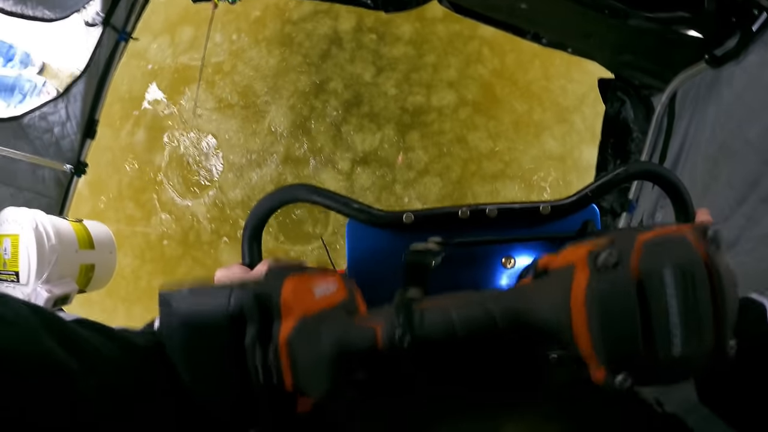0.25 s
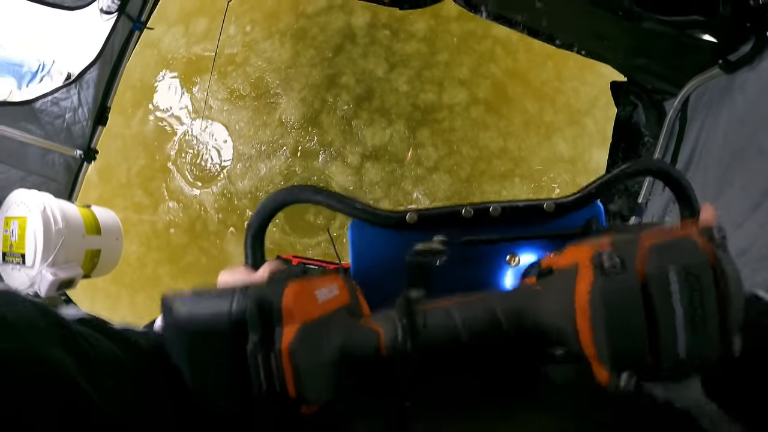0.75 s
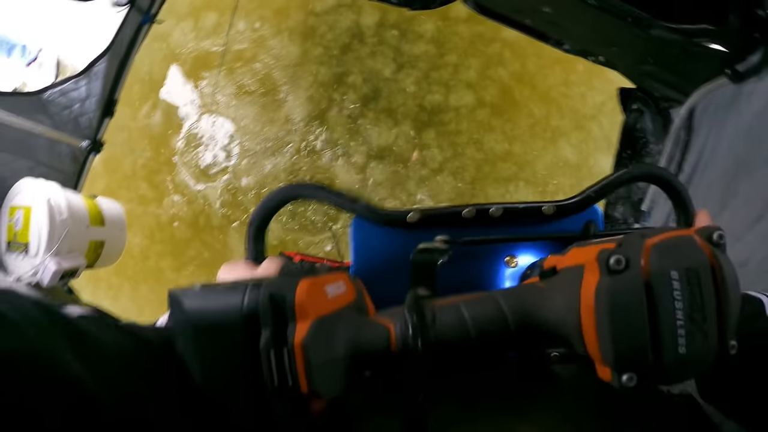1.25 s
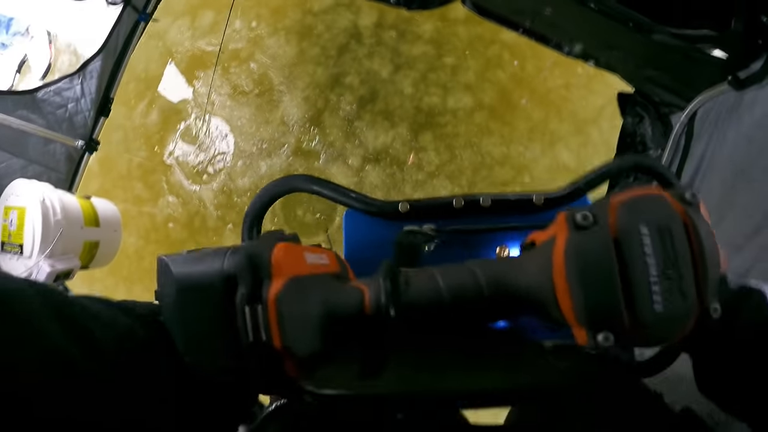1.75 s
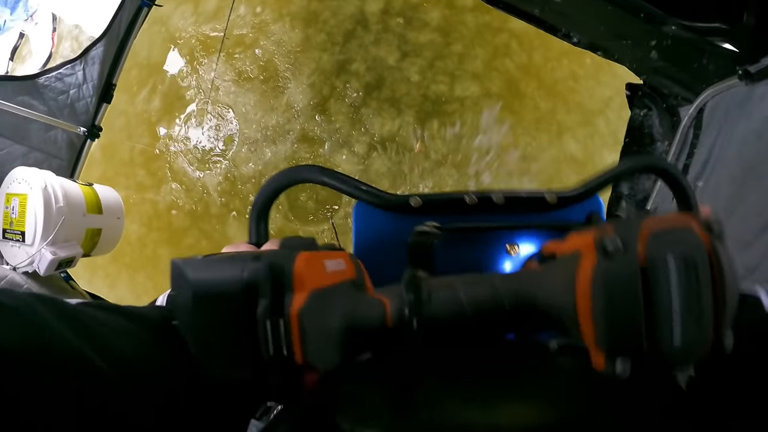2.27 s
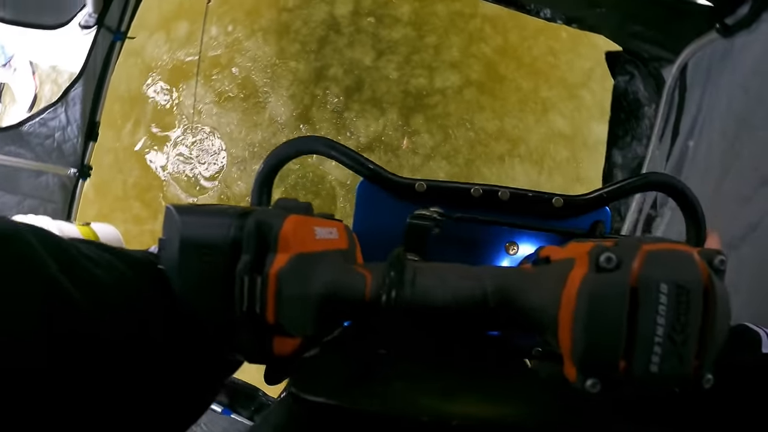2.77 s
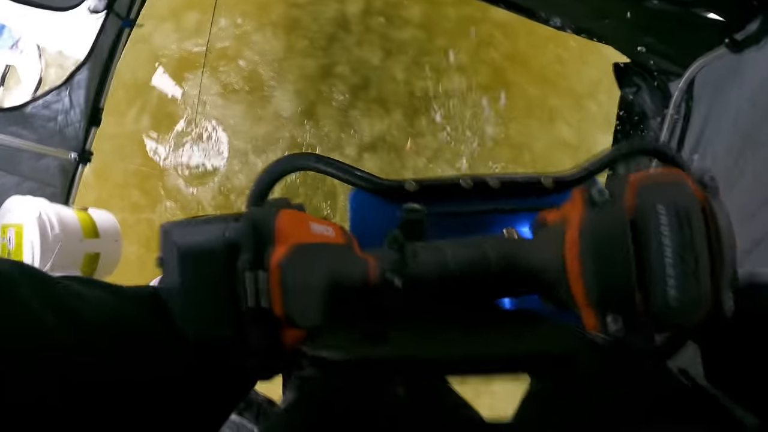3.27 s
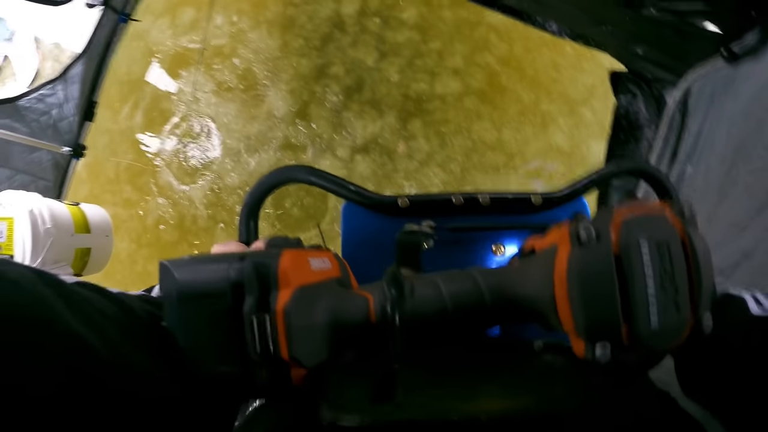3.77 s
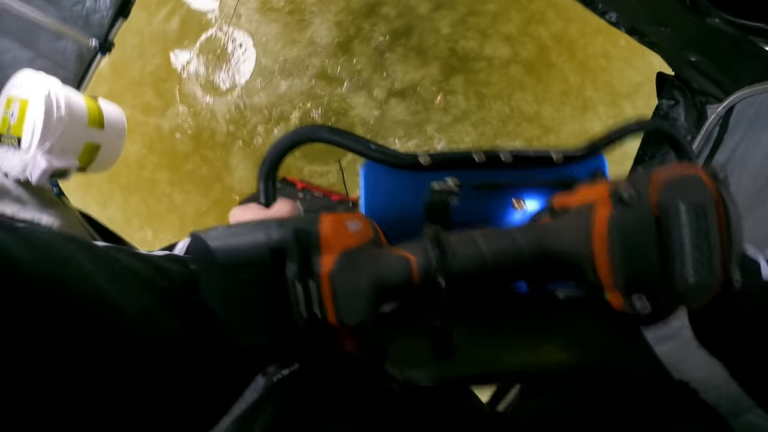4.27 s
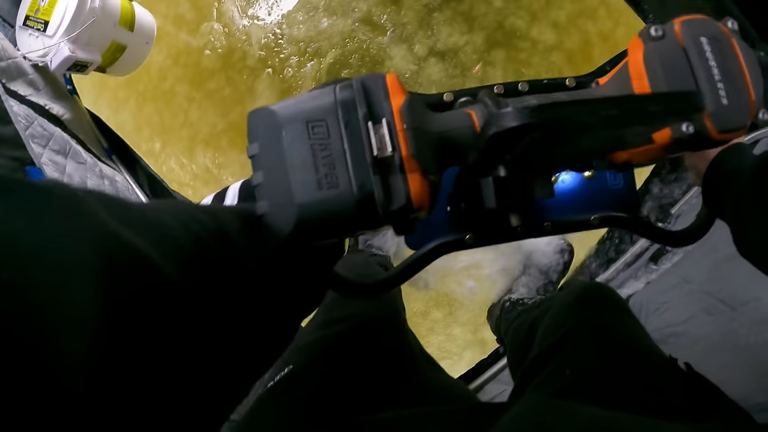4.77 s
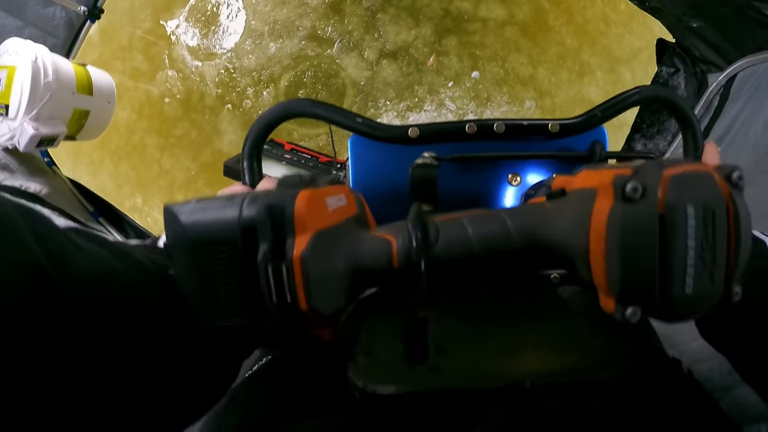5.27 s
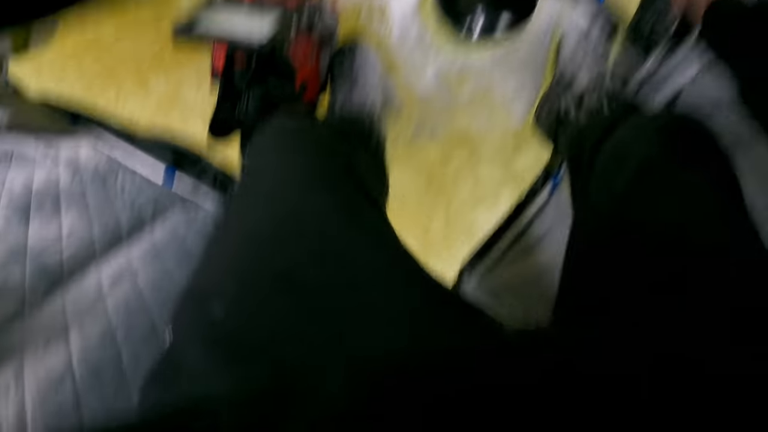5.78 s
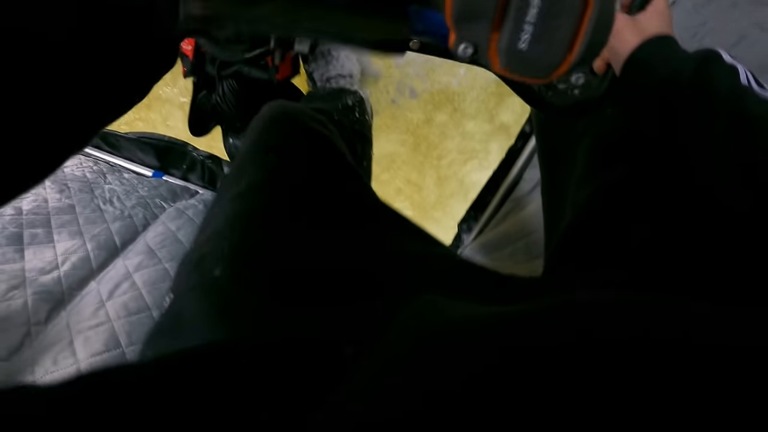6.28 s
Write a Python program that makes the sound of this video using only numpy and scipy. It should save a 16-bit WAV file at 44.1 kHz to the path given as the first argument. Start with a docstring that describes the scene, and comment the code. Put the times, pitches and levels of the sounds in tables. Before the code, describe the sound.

Close to the microphone in a fabric ice fishing shelter, a cordless drill drives an auger in seven short bursts. Each starts with a squeak and rises to a whine while the blades shave ice and the frame rumbles and knocks. A longer cut follows, then clicks and thuds. After one last brief pull, the auger is heaved up through the water with glugs and spray. Slush laps and clothing rustles faintly underneath.

```python
"""Inside a fabric fishing shelter on the ice, the microphone close to a cordless drill on an ice auger.
Slush laps in the hole and clothing rubs. From 0.25 s come seven short pulls of the trigger, then a long
cut at 3.6 s: each time the motor buzzes, the gears run up to a whine, and the blades shave ice while the
auger and its frame rumble and knock. On a ninth pull, at 5.4 s, the auger labours in slush and is heaved
up through the water in two surges, with glugs, spray and last knocks from the frame."""
import sys
import numpy as np
from scipy import signal
from scipy.fft import rfft, irfft, next_fast_len
from scipy.io import wavfile
from scipy.ndimage import uniform_filter1d

SR = 44100
rng = np.random.default_rng(int(sys.argv[2]) if len(sys.argv) > 2 else 0)


def inscribe(sig):
    """Save sig as 16-bit PCM at rate SR to the path in sys.argv[1].

    A 1-D sig is mono; a 2-D sig holds one channel per row.
    Samples are clipped to [-1, 1] before scaling.
    """
    pcm = np.round(np.clip(np.atleast_2d(sig).T, -1, 1) * 32767)
    wavfile.write(sys.argv[1], SR, pcm.astype(np.int16))


N = 287973
T = np.arange(N) / SR


def amp(db):
    """Decibels to gain."""
    return 10 ** (np.asarray(db) / 20)


def unit(x):
    """Scales to rms 1."""
    return x / np.sqrt(np.mean(x ** 2) + 1e-20)


def add(mix, s, sound):
    """Mixes a sound in at time s."""
    part = mix[max(round(s * SR), 0):][:len(sound)]
    part += sound[:len(part)]


def swell(start, end, rise, fall):
    """An envelope that rises from start, holds, and dies away after end; all in seconds."""
    return (1 - np.exp(-(np.maximum(T - start, 0) / rise) ** 2)) * np.exp(-np.maximum(T - end, 0) / fall)


def wander(hz):
    """Random drift of rms 1, mostly slower than hz."""
    size = next_fast_len(N, real=True)
    rolloff = 1 + (np.fft.rfftfreq(size, 1 / SR) / hz) ** 4
    return unit(irfft(rfft(rng.standard_normal(size)) / rolloff, size)[:N])


def colour(x, points, size=4096):
    """Causal filter with the given (Hz, dB) outline."""
    hz, db = np.transpose(points)
    outline = np.interp(np.log(abs(np.fft.fftfreq(size, 1 / SR)) + 1), np.log(hz + 1), db)
    response = np.exp(np.conj(signal.hilbert(np.log(amp(outline) + 1e-5))))  # minimum phase
    return signal.oaconvolve(x, np.fft.ifft(response).real[:size // 2])[:len(x)]


def resonate(x, hz, width):
    """A resonance of gain 1, width in Hz, whose pitch can follow a curve."""
    turn = np.exp(2j * np.pi * np.cumsum(hz * np.ones(len(x))) / SR)
    pole = np.exp(-np.pi * width / SR)
    return 2 * (turn * signal.lfilter([1 - pole], [1, -pole], x / turn)).real


def grains(per_s, spread_db):
    """Random tiny impulses, most of them small and a few large."""
    size = amp(spread_db * np.minimum(rng.exponential(1, N), 4))
    return size * rng.choice([-1., 1.], N) * (rng.random(N) < per_s / SR)


def steady(x, seconds):
    """Holds the mean power at 1 over stretches of the given length, keeping the finer grain."""
    power = uniform_filter1d(uniform_filter1d(x ** 2, int(seconds * SR)), int(seconds * SR))
    return x / np.sqrt(abs(power) + 1e-12)


def hum(hz=80, db=-52.5):
    """A faint, wavering low hum."""
    pitch_hz = hz * (1 + 0.032 * wander(10.5))
    return amp(db + 2.3 * wander(3.0)) * unit(np.sin(2 * np.pi * np.cumsum(pitch_hz) / SR))


# Bright spectrum shared by hiss, clothing and clicks: (frequency [Hz], level [dB])
RUSTLE_SPECTRUM = [(650, -1.5), (1100, -5), (2000, 0.5), (3300, -1), (4200, 0), (7200, -6.5), (9700, -9.5),
                   (12000, -23), (15000, -35)]

def hiss(db=-73):
    """A faint hiss, independent left and right."""
    return amp(db) * np.array([unit(colour(rng.standard_normal(N), RUSTLE_SPECTRUM)) for side in "LR"])


# Spells of rubbing clothes and sliding slush: (start [s], end [s], level [dB])
RUB_SPELLS = [(-0.03, 0.19, -40), (0.55, 2.75, -42), (3.38, 3.6, -43), (4.651, 4.78, -52), (5.0, 5.4, -53),
              (5.7, 6.14, -49.5), (6.448, 6.66, -45.5)]

def rubbing(floor_db=-56.5):
    """Clothes rub and slush slides in spells, over a quiet, constant rustle."""
    rustle = steady(colour(grains(7000, 1.1) * amp(1.4 * wander(50)), RUSTLE_SPECTRUM), 0.035)
    spells = sum(amp(db) * swell(start, end, 0.018, 0.036) for start, end, db in RUB_SPELLS)
    return (amp(floor_db) + spells) * rustle


# Slush moving in the hole: (frequency [Hz], level [dB])
LAP_SPECTRUM = [(25, -22), (70, -6.5), (130, -2.5), (260, 2), (400, -0.5), (620, -6), (850, -12),
                (1300, -16), (2200, -47)]

def lapping(db=-39, drift_db=0.86, calm_db=-2.5):
    """Slush laps in the hole all the while, less once the auger is out."""
    laps = steady(colour(grains(2000, 1.4), LAP_SPECTRUM), 0.034)
    auger_out = T > AUGER_HEAVES[-1][1]
    return amp(db + drift_db * wander(1.6) + calm_db * auger_out) * laps


def shifting_rasp(hz=3300, width=800, db=-51):
    """A thin, faint rasp while the auger is shifted in the hole."""
    friction = unit(resonate(resonate(grains(3400, 2.3), hz, width), hz, width))
    return amp(db + 1.2 * wander(23)) * swell(4.78, 5.31, 0.013, 0.017) * friction


# Clicks of the trigger and fittings: (time [s], level [dB], ring pitch [Hz], ring t60 [s])
FITTING_CLICKS = [(0.136, -21.5, 5220, 0.015), (2.918, -24, 2420, .03), (3.4, -36.5, 1952, 0.32),
                  (3.52, -25.5, 1940, 0.012), (5.207, -19.5, 2370, .03), (5.439, -27, 4300, .03),
                  (5.801, -24.5, 2260, 0.044)]

def clicks(snap_t60=0.034, snap_db=-4):
    """The trigger or a fitting gives a hard snap with one ringing mode."""
    out, t = np.zeros(N), T[:SR // 4]
    for s, db, hz, t60 in FITTING_CLICKS:
        noise = unit(colour(rng.standard_normal(len(t)), RUSTLE_SPECTRUM))
        snap = amp(snap_db - 60 * t / snap_t60) * noise
        ring = amp(-60 * t / t60) * np.sin(2 * np.pi * hz * t)
        add(out, s, amp(db) * (ring + snap))
    return out


# Air pockets ringing in the hole: (time [s], first pitch [Hz], last pitch [Hz], level [dB], length [s])
AIR_POCKETS = [(5.611, 383.6, 352, -10, 0.087), (5.639, 308, 272, -14.5, 0.108),
               (5.863, 553, 668, -20, 0.087), (5.935, 380, 336, -17.5, 0.081)]

def glugs():
    """Each air pocket swells and dies, gliding in pitch as the auger squeezes it."""
    out = np.zeros(N)
    for s, first_hz, last_hz, db, length in AIR_POCKETS:
        hz = np.linspace(first_hz, last_hz, int(length * SR))
        arch = np.sin(np.linspace(0, np.pi, len(hz)))
        add(out, s, amp(db) * arch * np.sin(2 * np.pi * np.cumsum(hz) / SR))
    return out * amp(3.2 * wander(51))


# Churned water and its spray: (frequency [Hz], level [dB])
CHURN_SPECTRUM = [(29, -68), (50, -35), (241, -6), (290, 0), (600, -10.5), (658, -8), (856, -22),
                  (1450, -32), (2000, -31), (2600, -63), (4400, -120)]
SPRAY_SPECTRUM = [(600, -18), (1100, -6), (1700, -2.5), (2700, -0.5), (3800, -3.5), (7000, -10.5),
                  (10500, -21), (12000, -34), (15000, -60)]
# Heaves through the water: (start [s], end [s], rise [s], surge level [dB], spray level [dB],
# spray slope [dB/s], first gurgle pitch [Hz], last gurgle pitch [Hz])
AUGER_HEAVES = [(5.437, 5.71, 0.052, -12, -13.5, -77, 450, 286),
                (5.815, 5.983, .02, -16, -28, -16, 555, 328)]

def heaves(churn_db=-4, gurgle_db=-7, settle_s=0.026):
    """Each heave churns the water: the gurgle sinks in pitch while the spray thins out."""
    surge, splash, gurgle_hz = np.zeros((3, N))
    for start, end, rise, surge_db, spray_db, spray_slope, first_hz, last_hz in AUGER_HEAVES:
        heave = swell(start, end, rise, settle_s)
        surge += amp(surge_db) * heave
        splash += amp(spray_db + spray_slope * np.clip(T - start, 0, end - start)) * heave
        gurgle_hz = np.where(T >= start, np.interp(T, [start, end], [first_hz, last_hz]), gurgle_hz)
    churn = steady(colour(grains(900, 4.2), CHURN_SPECTRUM), 0.019)
    gurgle = steady(resonate(resonate(grains(400, 3.2), gurgle_hz, 110), gurgle_hz, 140), 0.014)
    spray = steady(colour(grains(4000, 1.3) * amp(2.0 * wander(110)), SPRAY_SPECTRUM), 0.043)
    return surge * (amp(churn_db) * churn + amp(gurgle_db) * gurgle) + splash * spray


# Low modes of the struck frame: (frequency [Hz], level [dB], t60 [s])
THUD_MODES = [(189, -3.5, 0.06), (279, -6, 0.089), (318, 2, 0.037), (363.3, 1.5, 0.066), (464.4, 5, 0.061),
              (570, -1.5, 0.072), (833, -16.5, 0.16), (1054, -15.5, 0.03)]
# The clatter after a knock: (frequency [Hz], level [dB])
CLATTER_SPECTRUM = [(400, -14), (700, 3), (1400, -4), (2400, -3), (3200, -5), (6800, -8.5), (10000, -28),
                    (12000, -39), (15000, -63)]
# Knocks of blades, auger and frame: (time [s], thud level [dB], relative clatter level [dB])
FRAME_KNOCKS = [(0.132, -32.5, -35), (0.382, -6.5, -33), (1.016, -5, -32), (1.195, -24, -46),
                (1.554, -11, -34), (2.408, -19.5, -35), (2.585, -25, -32), (2.618, -20.5, -30.5),
                (2.769, -25.5, -52), (3.183, -13, -17), (3.27, -10.5, -24), (3.344, -11, -27),
                (4.984, -14, -31.5), (5.124, -19, -35), (5.152, -19.5, -31), (5.187, -4, -28.5),
                (5.198, -14, -25.5), (5.583, -7, -35), (5.622, -4.5, -24), (5.651, -14, -36),
                (5.841, -19, -20), (5.977, -8.5, -28), (6.062, -23.5, -58), (6.081, -26, -58),
                (6.122, -26, -38), (6.295, -27, -44.5), (6.455, -31, -39)]

def knocks(clatter_trim_db=-2, rise_s=0.00092, clatter_t60=0.17, hard_db=-15, deepen=0.5):
    """Each knock rings the frame's low modes and shakes loose a short clatter."""
    thuds, shaking, t = np.zeros(N), np.zeros(N), T[:SR // 3]
    rattle = steady(colour(grains(5000, 3.9), CLATTER_SPECTRUM), 0.016)
    hz, db, t60 = np.transpose(THUD_MODES)[:, :, None]
    attack = 1 - np.exp(-(t / rise_s) ** 2)
    for s, thud_db, clatter_db in FRAME_KNOCKS:
        grip = 1 + 0.052 * rng.standard_normal(hz.shape)  # the grip detunes the ring
        tilt_db = deepen * (hard_db - thud_db) * np.log2(hz / hz[0])  # harder knocks reach deeper modes
        modes = amp(db + tilt_db - 60 * t / t60) * np.sin(2 * np.pi * hz * grip * t)
        ring = (modes[::2].sum(0) - modes[1::2].sum(0)) * attack  # modes alternate in sign
        add(thuds, s, amp(thud_db) * ring / abs(ring).max())
        add(shaking, s, amp(clatter_db - 60 * t / clatter_t60))
    return thuds + amp(clatter_trim_db) * shaking * rattle


# Shaved ice and the shaking auger: (frequency [Hz], level [dB])
SCRAPE_SPECTRUM = [(650, -47), (1100, -15.5), (1340, -10.5), (2360, -1.5), (2700, -5), (3390, -2.5),
                   (4000, -3), (4360, -2.5), (6050, -6.5), (6680, -6), (8970, -16), (9900, -15),
                   (12100, -34), (13600, -36), (15000, -63)]
RUMBLE_SPECTRUM = [(30, -45), (90, -15.5), (150, -7), (250, -9), (310, -3.5), (400, -2.5), (520, -7),
                   (720, -10.5), (1000, -13.5), (1300, -23), (2500, -50)]
# Resonances of the frame: (frequency [Hz], width [Hz], level over the rumble [dB])
FRAME_MODES = [(310, 7.9, -12), (354.4, 41, 4), (466, 36, 4.5), (582, 61, 3), (826, 17.6, 10.5),
               (934, 21, 5), (1176, 25, -2)]
# Trigger pulls, driving blades and drill: (pressed [s], run-up [s], released [s], whine overhang [s],
# relative whine level [dB], squeak level [dB], scrape level [dB], rumble level [dB])
TRIGGER_PULLS = [(0.252, 0.272, 0.52, 0.0067, -35, -19.5, -16, -20.5),
                 (0.795, 0.815, 1.079, 0.027, -34, -19, -16, -20),
                 (1.278, 1.296, 1.572, 0, -36, -19.5, -16.5, -19.5),
                 (1.744, 1.765, 1.971, 0.017, -34, -19, -16, -20.5),
                 (2.112, 2.132, 2.351, 0.016, -29, -23, -16.5, -20),
                 (2.424, 2.435, 2.487, 0.0084, -50, -39, -26, -23),
                 (2.916, 2.929, 3.36, 0.017, -32, -18, -16.5, -19.5),
                 (3.623, 3.645, 4.668, 0, -23, -29, -17, -19.5),
                 (5.438, 5.462, 5.548, 0.098, -26.5, -22.5, -28.5, -25.5)]

def blades(muffle_db_per_s=-2.5, drag_db_per_s=0.5, groan_hz=285, squeal_hz=1200, damping=0.82):
    """The blades catch and break free; each catch sheds a clump of chips and jolts the frame."""
    scrape, rumble, packed = np.zeros((3, N))
    for pressed, start, released, *_, scrape_db, rumble_db in TRIGGER_PULLS:
        cut_s = np.clip(T - start, 0, released - start)
        packed = np.where(T >= pressed, cut_s, packed)  # piling chips muffle the scrape and add drag
        scrape += amp(scrape_db + muffle_db_per_s * cut_s) * swell(start - .006, released, .029, .029)
        shaking = swell(start - .008, released + .018, .017, .017)
        rumble += amp(rumble_db + drag_db_per_s * cut_s) * shaking
    catch = wander(143)
    chips = colour(grains(9000, 1.5) * amp(0.55 * catch), SCRAPE_SPECTRUM)
    jolts = colour(grains(1500, 2.17) * amp(catch + wander(22.0)), RUMBLE_SPECTRUM)
    frame = jolts + sum(amp(db) * resonate(jolts, hz, width) for hz, width, db in FRAME_MODES)
    frame += amp(7) * packed ** 2 * resonate(jolts, groan_hz, 43.4)  # a packed hole groans lower
    frame += amp(15) * packed ** 4 * resonate(jolts, squeal_hz, 45.6)  # and at last squeals
    deep_shaking = signal.lfilter(*signal.butter(1, 220, fs=SR), jolts)
    frame -= damping * packed * deep_shaking  # the chips damp it
    return scrape * steady(chips, 0.052) + rumble * steady(frame, 0.067)


# Uneven ice makes the speed waver in the longest cut: (time [s], fastest gear mesh [Hz])
LONG_CUT_SPEED = [(3.7, 6740), (3.76, 7160), (3.8, 6584), (4.01, 6180), (4.2, 6750), (4.28, 7200),
                  (4.44, 6620), (4.66, 6520)]

def motor_speed(free_hz=7550, loaded_hz=6510, run_up_s=.021, bite_after_s=.075, sag_s=.07, coast_s=.25):
    """Fastest gear mesh in Hz: it runs up freely, sags as the blades bite, and coasts down on release."""
    mesh_hz = np.zeros(N)
    times, wavering_hz = np.transpose(LONG_CUT_SPEED)
    for pressed, start, released, *_ in TRIGGER_PULLS:
        age, coasting = np.maximum(T - start, 0), np.maximum(T - released, 0)
        bite = 1 - np.exp(-np.maximum(age - coasting - bite_after_s, 0) / sag_s)
        allowed_hz = free_hz + (loaded_hz - free_hz) * bite
        if start < times.mean() < released:  # the long cut
            allowed_hz = np.interp(T, times, wavering_hz)
        spin = (1 - np.exp(-age / run_up_s)) * np.exp(-coasting / coast_s)
        mesh_hz = np.where(T >= pressed, allowed_hz * spin, mesh_hz)
    return mesh_hz


# Gear tones: (frequency [multiple of the fastest mesh], level [dB])
GEAR_TONES = [(0.342, -1), (.53, -2), (1, -2.5)]
# How well the gear case radiates: (frequency [Hz], level [dB])
CASE_RESPONSE = [(1800, 0.5), (2200, -5), (2420, 3), (2800, 3), (3310, 5.5), (3550, -4.5), (4000, -9),
                 (6300, -5.5), (7200, 3.5)]

def drill(flutter=0.00702, waver=0.00699, roughness=0.25, gears_db=1.25, buzz_db=-31, full_speed_hz=7550):
    """The motor buzzes against the standing auger, squeaks as it runs up, then whines through its gears."""
    running, squeaking, buzzing = np.zeros((3, N))
    for pressed, start, released, overhang, whine_db, squeak_db, *_ in TRIGGER_PULLS:
        running += amp(whine_db) * swell(start, released + overhang, 0.02, 0.0089)
        squeaking += amp(squeak_db) * np.exp(-((T - start - 0.028) / 0.012) ** 2)  # at full torque
        buzzing += np.interp(T - pressed, [0, .008, .04, .07], [0, 1.05, 2.0, 0])
    mesh_hz = motor_speed() * (1 + flutter * wander(67.0) + waver * wander(20.8))
    cycles = np.cumsum(mesh_hz) / SR
    tones = [np.sin(2 * np.pi * multiple * cycles) for multiple, db in GEAR_TONES]
    gears = 0
    for (multiple, db), tone in zip(GEAR_TONES, tones):
        case_db = np.interp(multiple * mesh_hz, *np.transpose(CASE_RESPONSE))
        tooth_play = amp(3.5 * wander(61)) * (1 + roughness * wander(340))  # each tone comes and goes
        gears += amp(db + case_db) * tooth_play * tone
    whine = amp(gears_db) * running * (mesh_hz / full_speed_hz) ** 1.3 * gears  # louder with speed
    windings = unit(resonate(resonate(grains(3000, 2.5), 2680, 1150), 2840, 1300))
    squeak = squeaking * unit(tones[1] * (1 + roughness * wander(500)))
    return whine + squeak + amp(buzz_db) * buzzing * windings


def shelter(x, t60, wet_db):
    """Ice floor and fabric walls return a brief cloud of reflections."""
    t = T[:SR // 4]
    taps = rng.choice([-1., 1.], len(t)) * (rng.random(len(t)) < 2000 / SR)
    taps *= (t > .003) * amp(-60 * t / t60)
    reflections = signal.oaconvolve(x, taps / np.linalg.norm(taps))[:N]
    return (x + amp(wet_db) * reflections) / np.sqrt(1 + amp(wet_db) ** 2)


# How much the two microphone ports differ: (frequency [Hz], side level against the middle [dB])
PORT_DIFFERENCE = [(5000, -55.5), (9000, -38), (11000, -20), (12000, -2), (15000, -1)]

def microphone_ports(x):
    """Both ports hear the same, except in the top treble, which scatters on its way to each."""
    t = T[:SR // 50]
    scatter = rng.standard_normal(len(t)) * np.exp(-t / .008)
    side = colour(signal.oaconvolve(x, scatter / np.linalg.norm(scatter))[:N], PORT_DIFFERENCE)
    return np.array([x + side, x - side])


def scene():
    """Drill, auger and water sit close to the microphone, in the centre, over a faint hiss."""
    auger = blades() + heaves() + glugs() + knocks() + clicks() + shifting_rasp()
    foreground = shelter(drill(), t60=0.049, wet_db=-12.5) + shelter(auger, t60=0.062, wet_db=-10.5)
    background = lapping() + rubbing() + hum()
    return microphone_ports(foreground + background) + hiss()


def record(dry, notch_hz=9130, bass_cut_hz=42., ceiling=0.71, top_hz=15050):
    """The microphone has a narrow treble notch and a bass cut; peaks are rounded; then a band limit."""
    x = signal.lfilter(*signal.iirnotch(notch_hz, 11., SR), dry)
    x = signal.lfilter(*signal.butter(2, bass_cut_hz, "highpass", fs=SR), x)
    x = x / (1 + (x / ceiling) ** 6) ** (1 / 6)
    band_limit = signal.firwin(511, top_hz, window=("kaiser", 9), fs=SR)
    return signal.oaconvolve(x, band_limit[None], "same")


dry = scene()
out = record(dry)
inscribe(out)
```